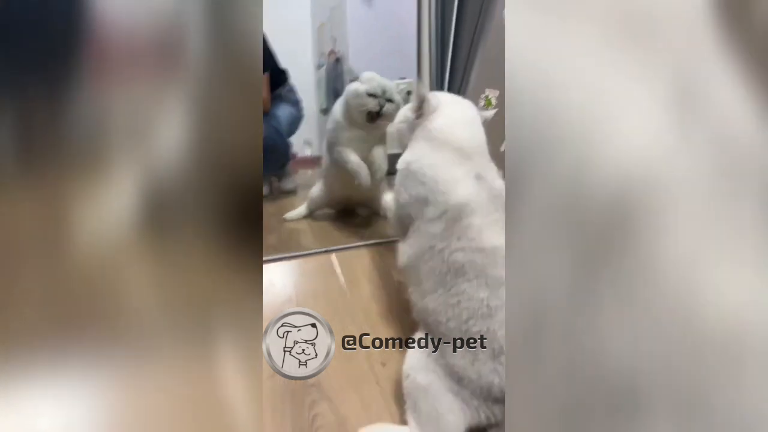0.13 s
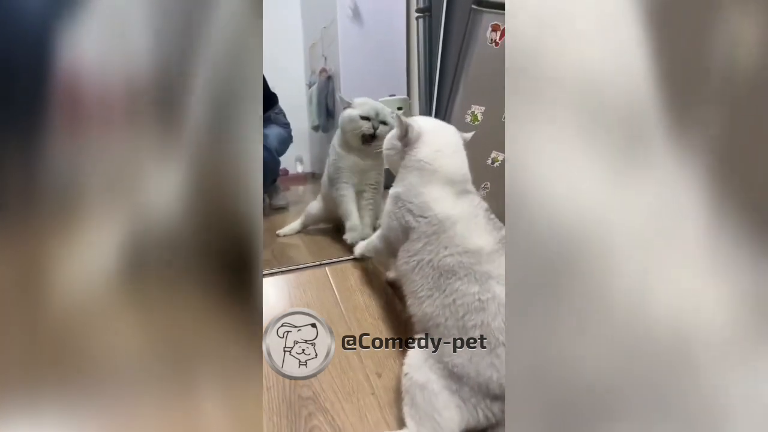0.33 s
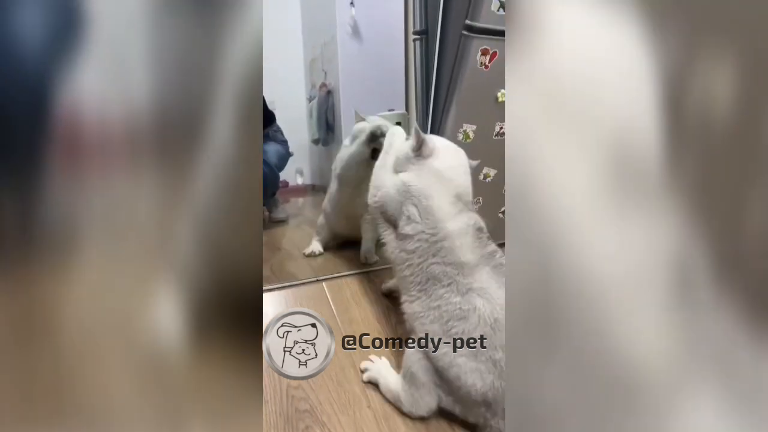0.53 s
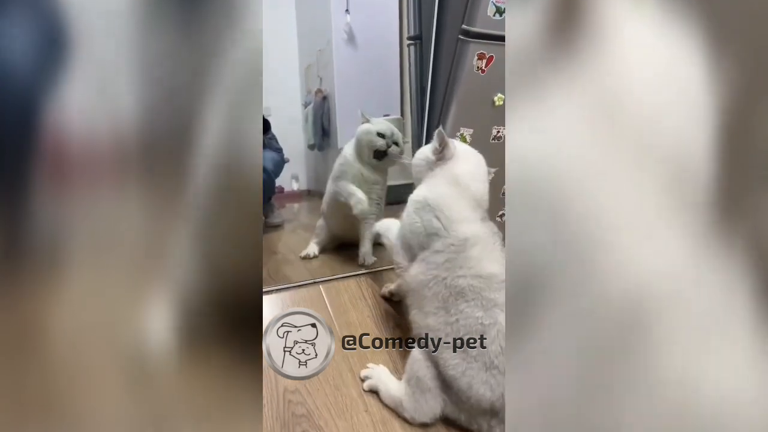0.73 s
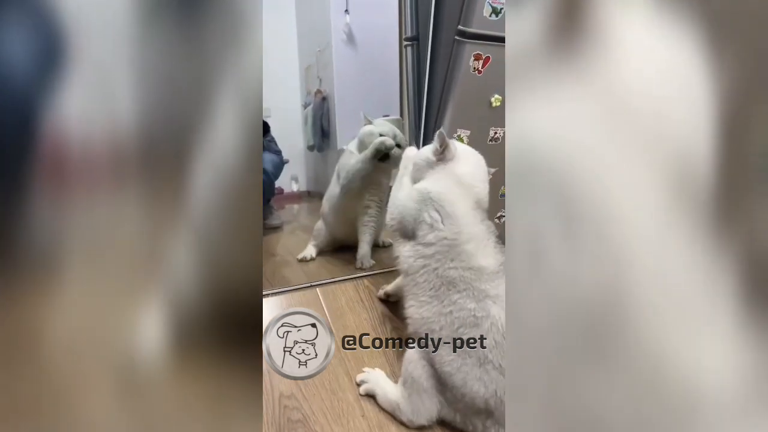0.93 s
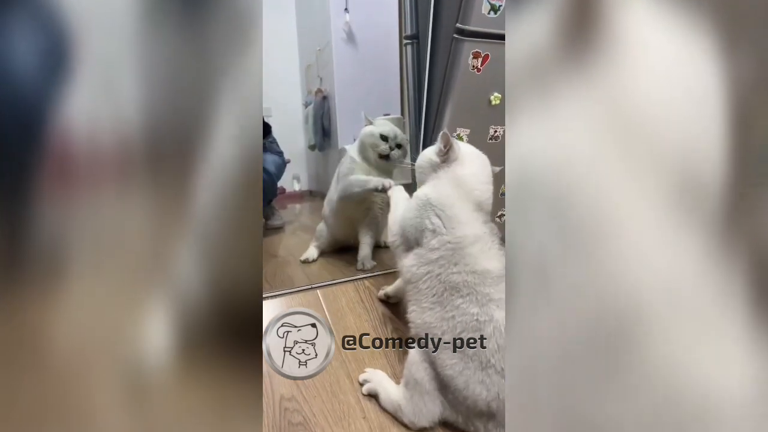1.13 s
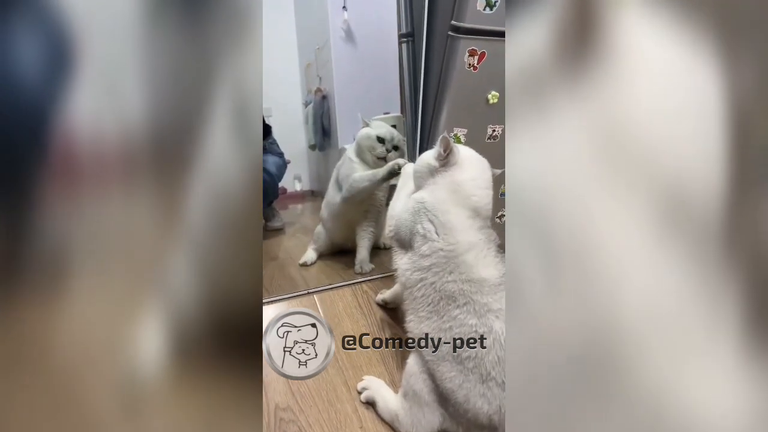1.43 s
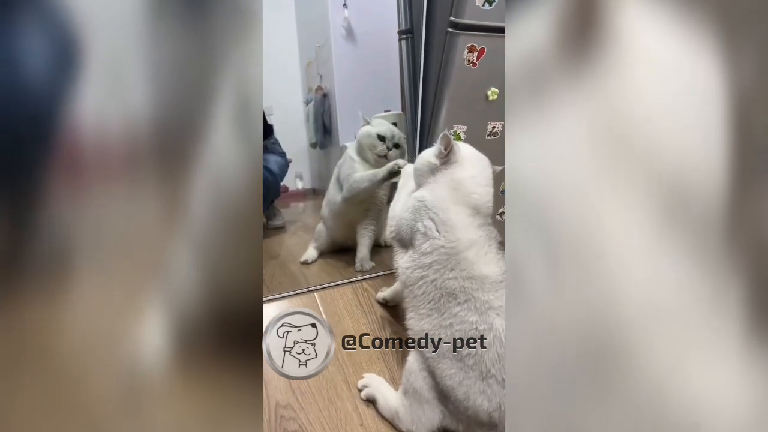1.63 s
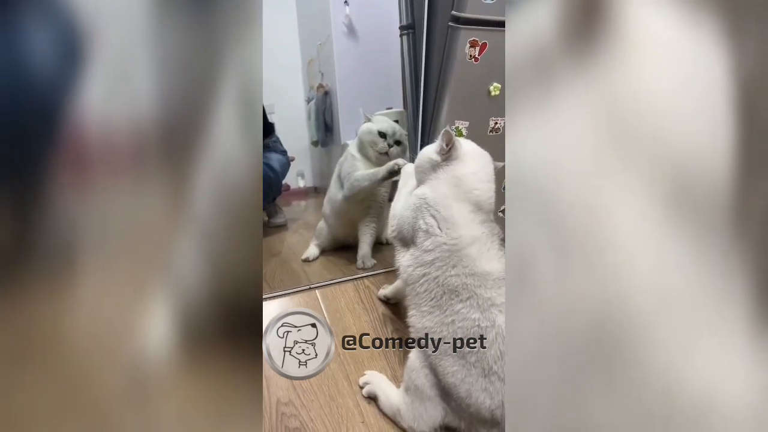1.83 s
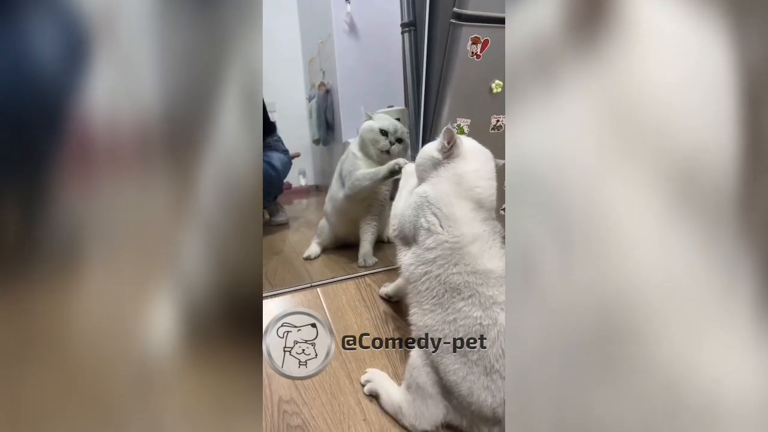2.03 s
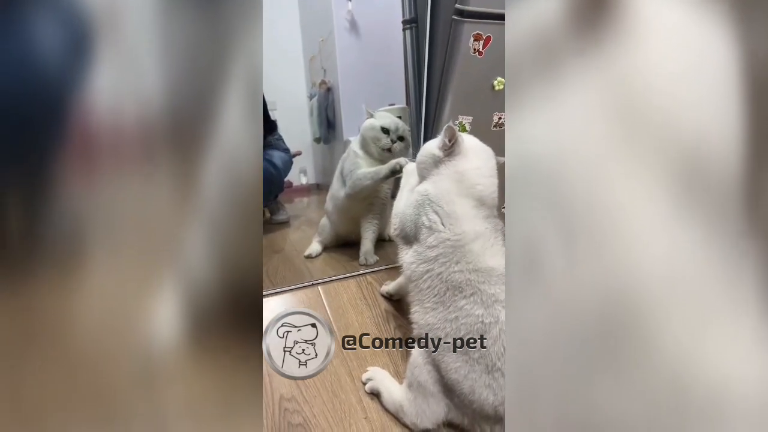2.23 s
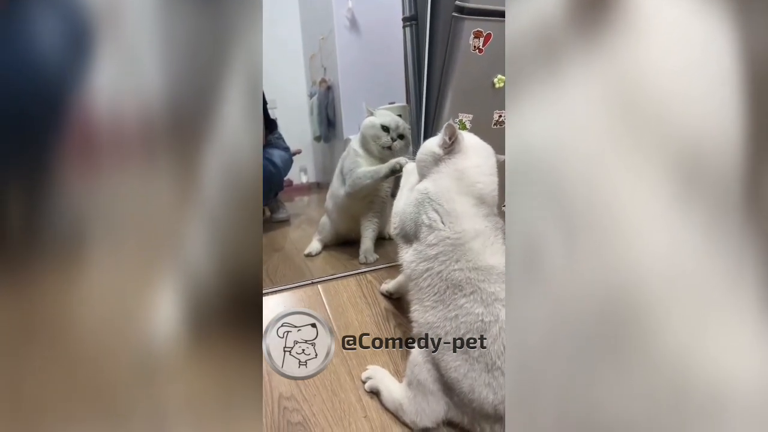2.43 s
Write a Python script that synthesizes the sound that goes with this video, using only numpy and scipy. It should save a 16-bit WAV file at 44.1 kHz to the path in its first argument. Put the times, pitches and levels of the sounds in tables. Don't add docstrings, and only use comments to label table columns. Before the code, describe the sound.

An angry cat screams harshly up close, lunges with floor thuds, then trails off in a falling whine

```python
import sys
import numpy as np
from scipy import signal
from scipy.fft import rfft, irfft
from scipy.io import wavfile
from scipy.ndimage import uniform_filter1d, map_coordinates

SR = 44100
rng = np.random.default_rng(int(sys.argv[2]) if len(sys.argv) > 2 else 0)


def how_loud(loudness_db):
    steps = np.asarray(loudness_db, float) / 20
    return 10 ** steps


def put_to_file(sound):
    columns = np.atleast_2d(sound).T
    safe = np.clip(columns, -1, 1)
    whole_steps = np.round(safe * 32767)
    wavfile.write(sys.argv[1], SR, whole_steps.astype(np.int16))


N = 114660

# time_s, pitch_hz
PUSHED_PITCH = [(0.0, 528), (0.086, 783), (0.164, 944), (0.202, 873.6), (0.244, 995.3), (0.3, 964.8),
                (0.324, 922), (0.438, 893.7), (0.464, 930), (0.526, 902.3), (0.61, 905.6), (0.682, 993.5),
                (0.736, 972.6), (0.912, 948.8), (0.96, 902), (1.098, 905.4), (1.202, 837.6), (1.37, 815.5)]
# time_s, level_db
VOICE_EFFORT = [(0.0, -32), (0.08, -29.5), (0.09, -24.5), (0.16, -16.5), (0.22, -18.5), (0.25, -15.5),
                (0.32, -17), (0.58, -18), (0.83, -20.5), (0.86, -18.5), (1.04, -25), (1.3, -21),
                (1.32, -27), (1.54, -38), (1.95, -44), (2.11, -40.5), (2.58, -42), (2.6, -41)]
# time_s, mouth_opening_db, double_beat (0-1), jaw_resonance_hz, tongue_resonance_hz
THROAT_SHAPE = [(0, -6, 0.86, 950, 1730), (.09, -10.5, 0.15, 1560, 2360), (.16, -2.5, 1, 2240, 4620),
                (.3, 18, 0.94, 2410, 5000), (.38, 27.5, 0.93, 2570, 4760), (.6, 3, 0.9, 2550, 3740),
                (.68, 24, 0.93, 2280, 4740), (.87, 1, 1, 2326, 3930), (.98, -2.5, 1, 2186, 2750),
                (1.13, -2.5, 0.91, 2150, 3560), (1.2, -4.5, 0.03, 1740, 2960),
                (1.33, -12, 0.11, 1650, 2580), (1.45, -8.5, 0.04, 1603, 2360), (1.9, -20, 0, 1186, 2106),
                (2.6, -39, 0.09, 1274, 1960)]
# time_s, level_db
BREATH_LEVEL = [(0, -34), (.1, -24), (.16, -9), (.3, -12), (.37, -20), (.45, -27), (.6, -27), (.66, -14),
                (.75, -22), (.85, -28), (.95, -17), (1, -26), (1.13, -26), (1.2, -14), (1.4, -15),
                (1.5, -32)]
# frequency_hz, level_db
BREATH_COLOUR = [(1500, -8), (4000, -2), (7000, 5), (10000, 10)]
# time_s, lowest_tone_lift_db, treble_slope_db_per_octave
HEAD_TURN = [(0, 7.5, -9), (.09, 0, 1), (.15, 1, -0.5), (.9, 11, 2.5), (1.0, 0, -2.5), (1.15, -10.5, -7.5),
             (1.3, -1, -0.5), (1.5, -0.5, -3.5), (1.65, 7, 1), (1.85, 10, -0.5), (2.0, -2.5, 3.5),
             (2.6, -1, 1.5)]
# time_s, level_db (against the voice)
NOSE_TONE = [
    (1.1, -30),
    (1.35, -19),
    (1.7, -2.5),
    (2.0, -10.5),
    (2.6, -10),
]
# frequency_hz, gain_db
OPEN_TRACT = [(450, -48), (1500, -17), (2000, -10), (3300, -7), (7000, -8.5), (7900, -12), (9000, -17),
              (13500, -17)]
SHUT_TRACT = [(300, -20), (720, -2.5), (1300, 6), (2000, 5.5), (2700, -6.5), (3400, -34.5), (5500, -20),
              (8300, -42)]
# frequency_hz, gain_db
PORT_DIFFERENCE = [(200, -17), (500, -6.5), (5000, -2), (6200, -14), (8500, -10.5), (9800, 7), (11300, -6),
                   (12500, -18)]
# start_s, peak_db, pitch_hz
FLOOR_KNOCKS = [
    (0.002, -29, 366),
    (0.187, -13, 143.6),
    (0.208, -6.5, 108),
    (.247, -17.5, 94),
    (0.384, -26.5, 98.8),
    (.64, -29, 100.1),
    (1.406, -32, 114.8),
]
# time_s, level_db
BLAST_LEVEL = [(0, -46.5), (0.1, -48), (0.14, -54), (0.2, -26), (0.34, -38), (0.38, -33.5), (0.59, -43),
               (0.64, -35.5), (1.15, -51.5), (1.19, -49), (1.38, -56), (1.42, -47), (1.45, -50),
               (2.06, -79), (2.6, -61.5)]
# frequency_hz, level_db (per Hz)
BLAST_COLOUR = [(15, -69), (25, 2), (102, -4), (401, -16.5), (472, -11.5), (591, -35), (786, -43),
                (900, -41.5), (1170, -31), (1980, -120)]
# frequency_hz, level_db
SCUFFLE_COLOUR = [(100, -25), (300, -7.5), (500, -7), (1200, -11), (2500, -11), (8000, -44.5)]
# frequency_hz, level_db
HUSH_COLOUR = [(25, -16), (60, 0), (160, -3), (260, -12), (1000, -15), (1700, -24), (3000, -33),
               (14000, -48)]

SAG_HZ_PER_S, REST_HZ, REST_SAG_HZ_PER_S, REST_BEND_HZ = 335, 654.2, 13, 27.8
JITTER_SHARE, JITTER_RATE_HZ = 0.005, 70
WAVER_SHARE, WAVER_RATE_HZ, CALM_SHARE = 0.008, 16, 0.15
SHIMMER_DB, SHIMMER_RATE_HZ = 0.5, 45
FLICKER_DB, FLICKER_RATE_HZ = 3, 59
DOUBLE_DIP_HZ, DOUBLE_DIP_WIDTH_HZ, DOUBLE_DIP_DB = 1344, 180, -2
JAW_DB, JAW_WIDTH_HZ = 11, 400
TONGUE_DB, TONGUE_WIDTH_HZ = 8, 970
TOP_FROM_HZ, PATCHY_DB = 2060, 4
SWAY_RAD, SWAY_RATE_HZ = 0.98, 5.8
LEFT_LAG_S, PAN_OPEN_DB, PAN_SHUT_DB = 0.0003065, 1.2, 5
NEAR_T60_S, NEAR_DB, ROOM_GAP_S = 0.025, -5, 0.001
ROOM_T60_S, ROOM_DB, ROOM_CUT_HZ = 0.18, -8, 4940
WHINE_ROOM_DB = -9
OPPOSITE = np.array([[0.5], [-0.5]])
THUMP_RISE_S, THUMP_T60_S = 0.0048, 0.031
LUMP_DB, LUMP_RATE_HZ, SCUFFLE_DB = 2.5, 5, -7.5
ROOM_TONE_DB = -63.5
PORT_CUT_HZ, TOP_CUT_HZ = 73, 14400


def yowl():
    hz, share = pitch(), opening()
    source = folds(hz)
    wide = colour(source, OPEN_TRACT) * share
    shut = colour(source, SHUT_TRACT) * (1 - share)
    effort = how_loud(in_time(VOICE_EFFORT)[0])
    power = uniform_filter1d(np.mean((wide + shut) ** 2, axis=0), size=2000)
    even = effort / np.sqrt(power + 1e-9)
    wet = room(wide * even * how_loud(PAN_OPEN_DB * OPPOSITE), shut * even * how_loud(PAN_SHUT_DB * OPPOSITE))
    heard = np.sqrt(uniform_filter1d(np.mean(wet ** 2, axis=0), size=3000) + 1e-12)
    whine = np.sin(2 * np.pi * np.cumsum(hz) / SR)
    nose = how_loud(in_time(NOSE_TONE)[0]) * whine * 2 * OPPOSITE
    return effort * (wet / heard + nose)


def folds(hz):
    _, double, jaw_hz, tongue_hz = in_time(THROAT_SHAPE)
    nose_db, top_db = in_time(HEAD_TURN)
    turn = np.pi * np.cumsum(hz) / SR
    strained = strain()
    pulses = 0
    for k in range(1, 56):
        tone = k * hz / 2
        sway = drift(SWAY_RATE_HZ)
        lift_db = JAW_DB / (1 + ((tone - jaw_hz) / JAW_WIDTH_HZ) ** 2)
        lift_db += TONGUE_DB / (1 + ((tone - tongue_hz) / TONGUE_WIDTH_HZ) ** 2)
        lift_db += FLICKER_DB * strained * drift(FLICKER_RATE_HZ)
        lift_db += PATCHY_DB * sway * (tone > 3000)
        lift_db += nose_db * (k == 2)
        lift_db += top_db * np.log2(np.maximum(tone / TOP_FROM_HZ, 1))
        dip_db = DOUBLE_DIP_DB / (1 + ((tone - DOUBLE_DIP_HZ) / DOUBLE_DIP_WIDTH_HZ) ** 2)
        half = np.clip(double, 0, 1) * how_loud(dip_db)
        beat = half if k % 2 else 1
        slip = SWAY_RAD * strained * sway * OPPOSITE
        pulses = pulses + np.cos(k * turn + slip) * how_loud(lift_db) * beat * (tone < 15000)
    air = rng.standard_normal((2, N)) * 0.6 + rng.standard_normal(N) * 0.8
    puffs = colour(air, BREATH_COLOUR) * (1 + np.cos(turn)) * 5
    shimmer = how_loud(strained * SHIMMER_DB * drift(SHIMMER_RATE_HZ))
    return (pulses + how_loud(in_time(BREATH_LEVEL)[0]) * puffs) * shimmer


def pitch():
    t = np.arange(N) / SR
    end_s, end_hz = PUSHED_PITCH[-1]
    fall = end_hz - SAG_HZ_PER_S * (t - end_s)
    rest = REST_HZ - REST_SAG_HZ_PER_S * (t - end_s)
    sag = REST_BEND_HZ * np.logaddexp(fall / REST_BEND_HZ, rest / REST_BEND_HZ)
    hz = uniform_filter1d(np.where(t < end_s, in_time(PUSHED_PITCH)[0], sag), size=400)
    wobble = JITTER_SHARE * drift(JITTER_RATE_HZ) + WAVER_SHARE * drift(WAVER_RATE_HZ)
    return hz * (1 + strain() * wobble)


def opening():
    return np.clip(how_loud(in_time(THROAT_SHAPE)[0]), 0, 1)


def strain():
    return CALM_SHARE + (1 - CALM_SHARE) * opening()


def room(wide, shut):
    t = np.arange(SR // 2) / SR
    decay = how_loud(-60 * t / np.array([[[NEAR_T60_S]], [[ROOM_T60_S]]]))
    parts = rng.standard_normal((2, 2, len(t))) * decay * (t > ROOM_GAP_S)
    parts = signal.sosfilt(signal.butter(2, ROOM_CUT_HZ, fs=SR, output="sos"), parts)
    parts /= np.sqrt(np.sum(parts ** 2, axis=2, keepdims=True))
    tail = how_loud(NEAR_DB) * parts[0] + how_loud(ROOM_DB) * parts[1]
    x = wide + shut
    late = map_coordinates(x[0], [np.arange(N) - LEFT_LAG_S * SR], order=3)
    reflected = signal.fftconvolve(wide + how_loud(WHINE_ROOM_DB) * shut, tail, axes=1)[:, :N]
    out = np.array([late, x[1]]) + reflected
    return out.mean(axis=0) + colour(out[0] - out[1], PORT_DIFFERENCE) * OPPOSITE


def thumps():
    out = np.zeros(N)
    for start_s, peak_db, hz in FLOOR_KNOCKS:
        t = np.maximum(np.arange(N) / SR - start_s, 0)
        rise = 1 - np.exp(-t / THUMP_RISE_S)
        out += how_loud(peak_db - 60 * t / THUMP_T60_S) * rise * np.sin(2 * np.pi * hz * t) * 2
    return out


def blast():
    white = rng.standard_normal((3, N))
    air = rms_one(colour(white[0], BLAST_COLOUR))
    scuffle = how_loud(SCUFFLE_DB) * rms_one(colour(white[1:], SCUFFLE_COLOUR))
    return how_loud(in_time(BLAST_LEVEL)[0] + LUMP_DB * drift(LUMP_RATE_HZ)) * (air + scuffle)


def room_tone():
    white = rng.standard_normal((3, N))
    return how_loud(ROOM_TONE_DB) * rms_one(colour(white[:2] * 1.4 + white[2], HUSH_COLOUR))


def rms_one(x):
    return x / np.sqrt(np.mean(x ** 2) + 1e-20)


def in_time(rows):
    s, *columns = np.transpose(rows)
    return [np.interp(np.arange(N) / SR, s, c) for c in columns]


def drift(rate_hz):
    r = np.exp(-2 * np.pi * rate_hz / SR)
    white = rng.standard_normal(N + SR)
    return rms_one(signal.lfilter([1], [1, -2 * r, r * r], white)[SR:])


def colour(x, points):
    size = 4096
    hz, db = np.transpose(points)
    grid = np.maximum(np.arange(size // 2 + 1) * SR / size, 1)
    cepstrum = irfft(np.log(how_loud(np.interp(np.log(grid), np.log(hz), db))))
    cepstrum[1:size // 2] *= 2
    cepstrum[size // 2 + 1:] = 0
    response = irfft(np.exp(rfft(cepstrum)))
    return signal.fftconvolve(np.atleast_2d(x), response[None], axes=1)[:, :N]


def scene():
    return yowl() + thumps() + blast() + room_tone()


def low_pass(x):
    return signal.sosfilt(signal.butter(12, 14430, fs=SR, output="sos"), x)


def record(dry):
    x = signal.sosfilt(signal.butter(2, PORT_CUT_HZ, "high", fs=SR, output="sos"), dry)
    x = signal.sosfilt(signal.cheby2(12, 70, TOP_CUT_HZ, fs=SR, output="sos"), x)
    return low_pass(x)


dry = scene()
out = record(dry)
put_to_file(out)
```